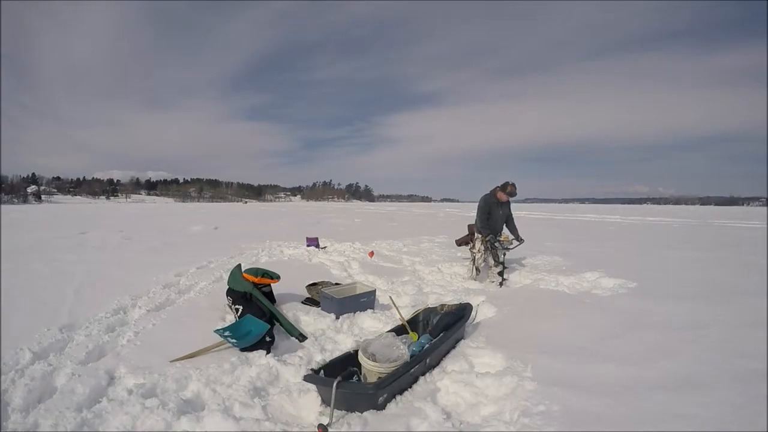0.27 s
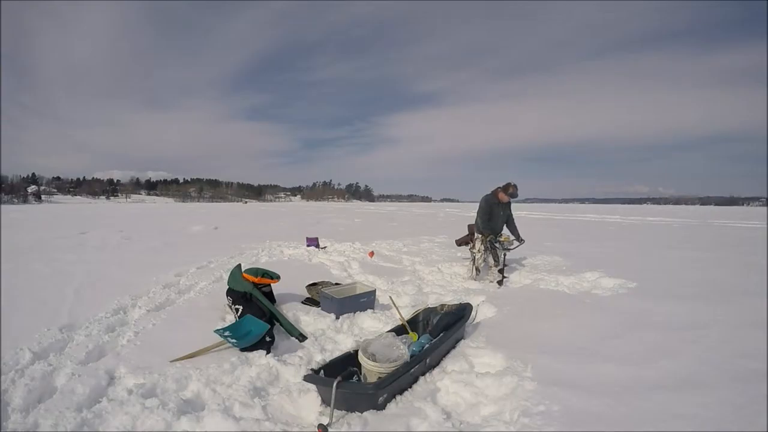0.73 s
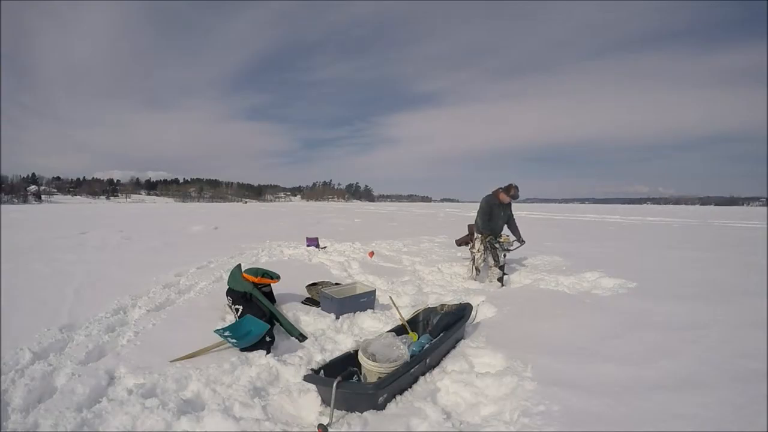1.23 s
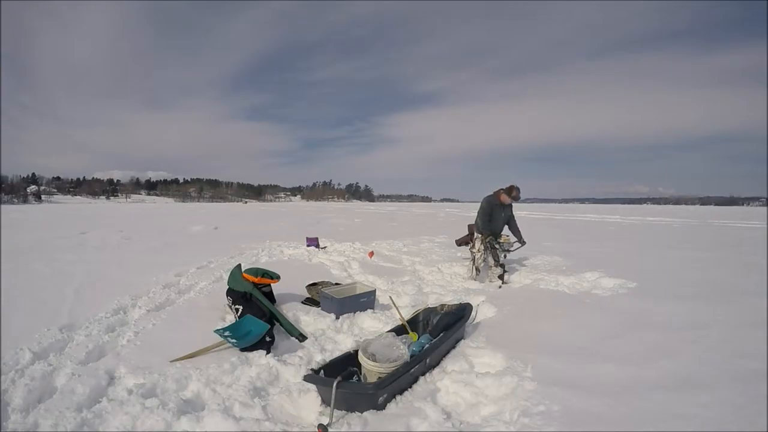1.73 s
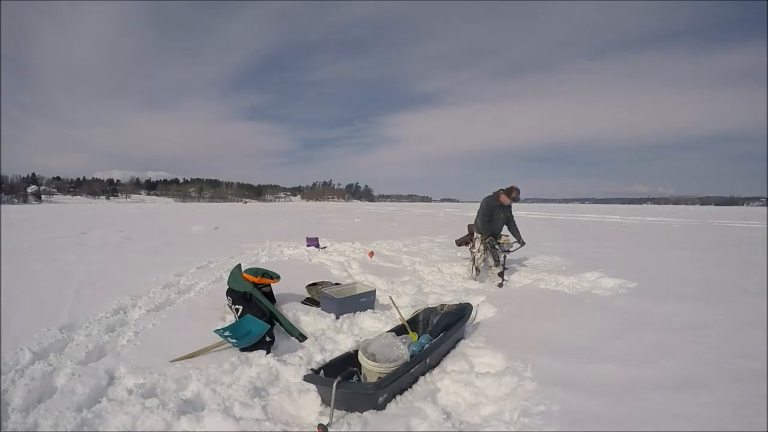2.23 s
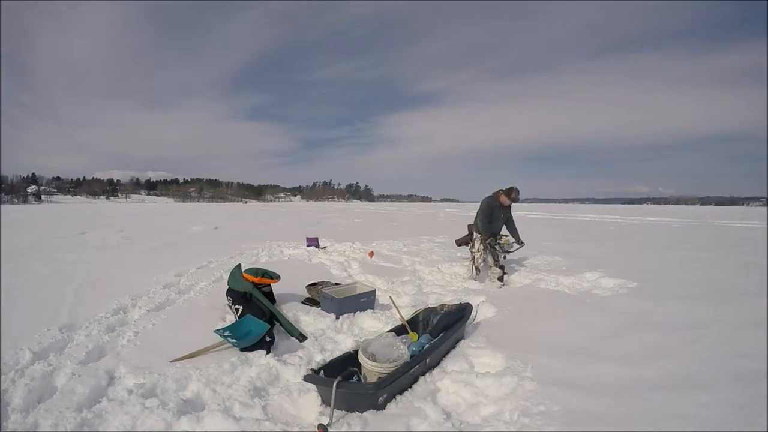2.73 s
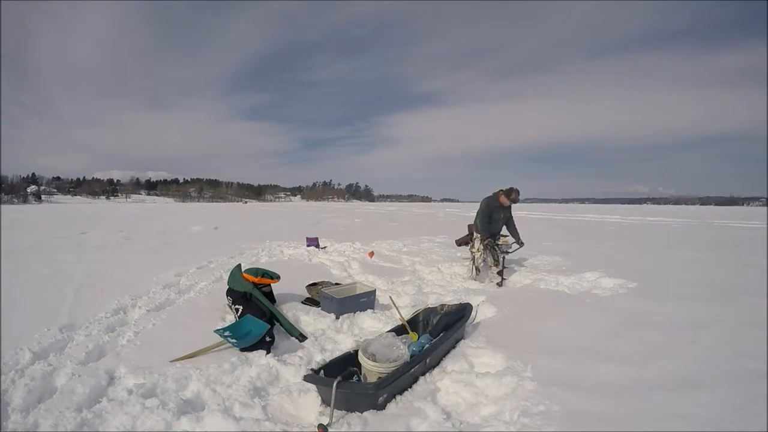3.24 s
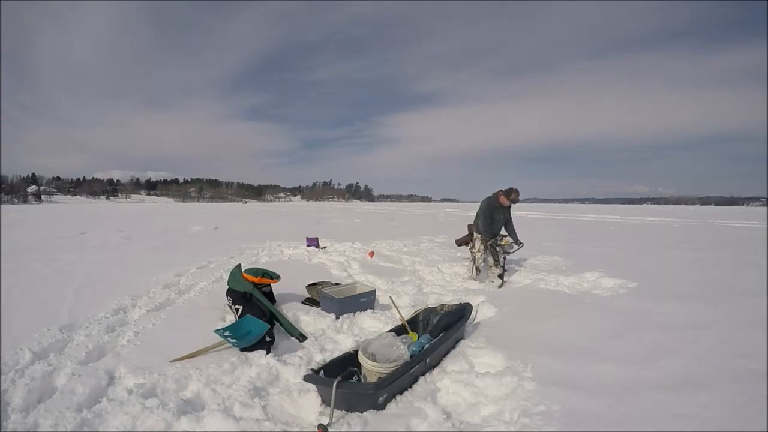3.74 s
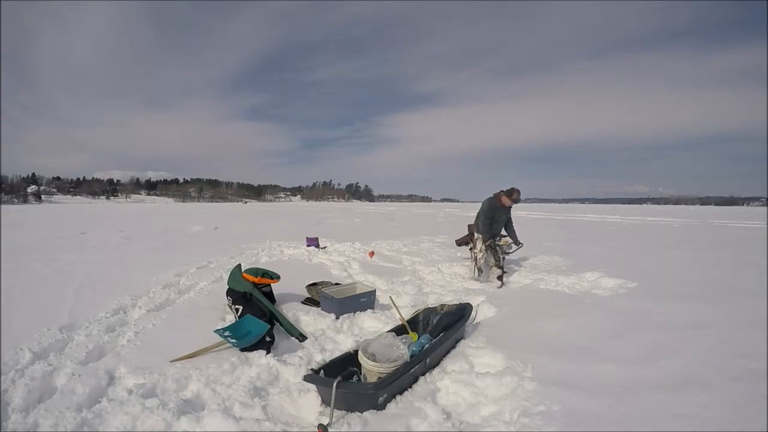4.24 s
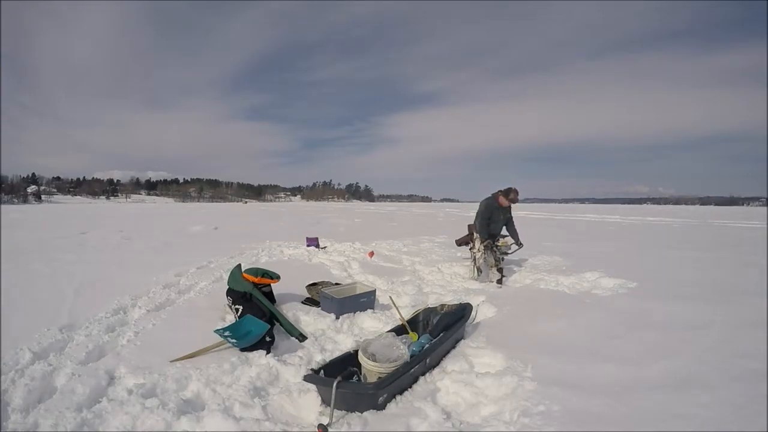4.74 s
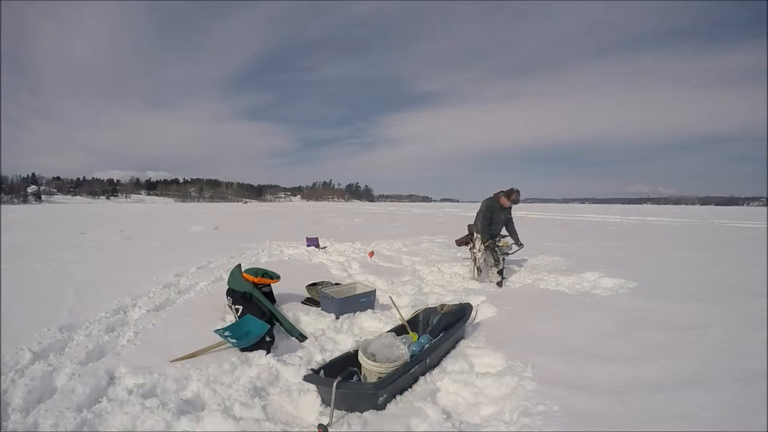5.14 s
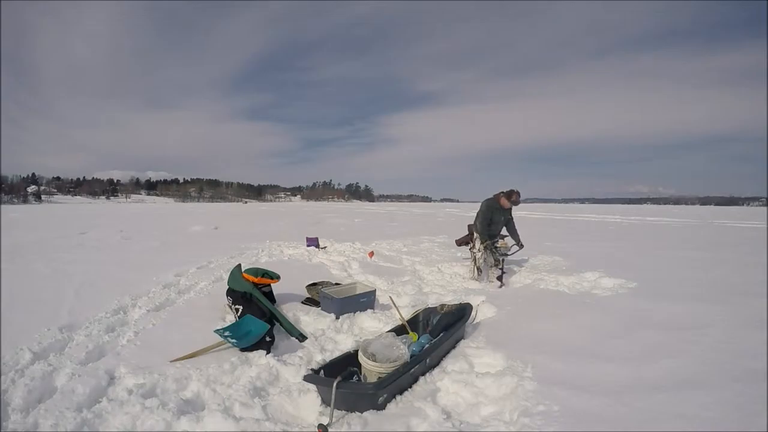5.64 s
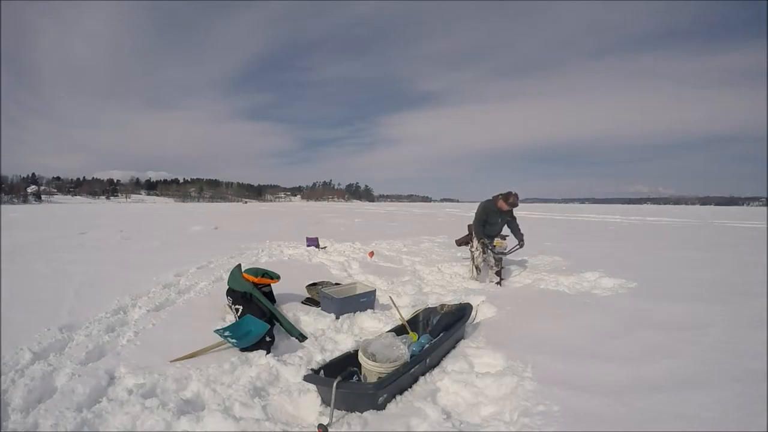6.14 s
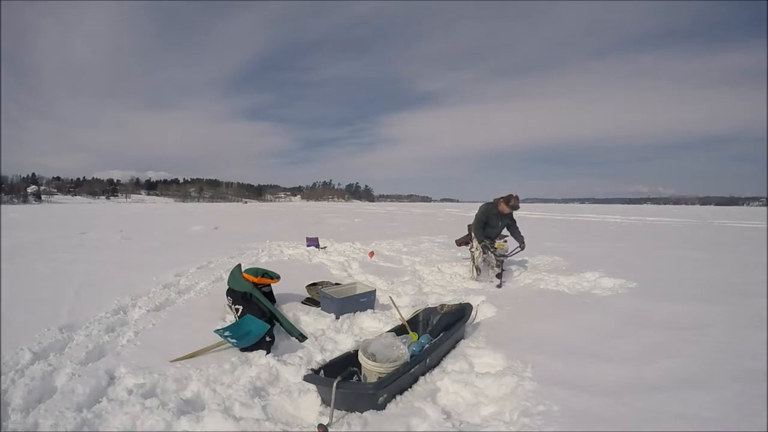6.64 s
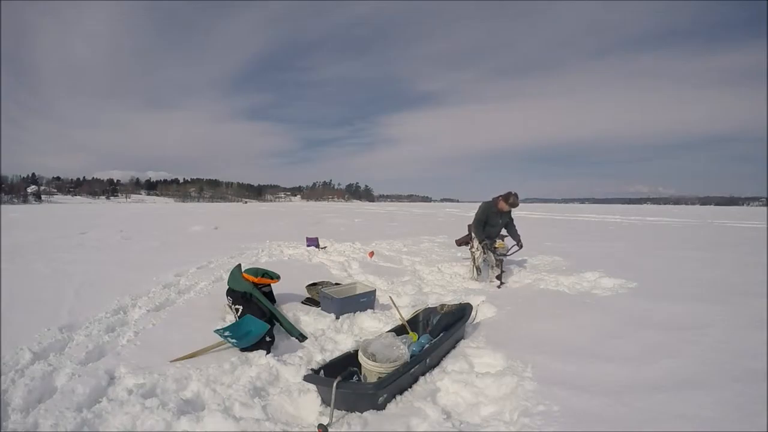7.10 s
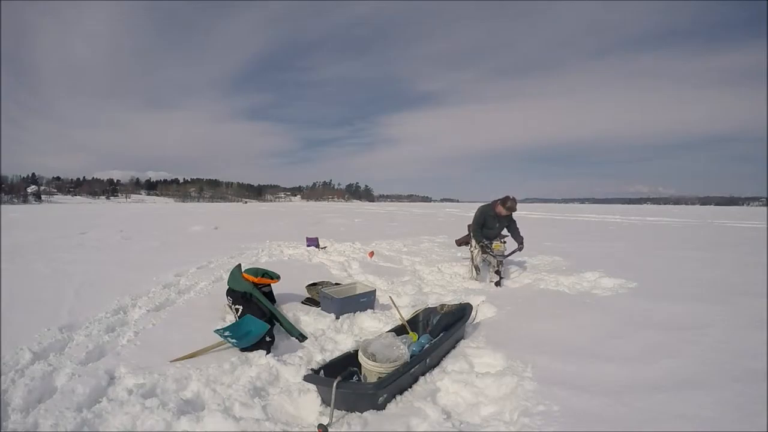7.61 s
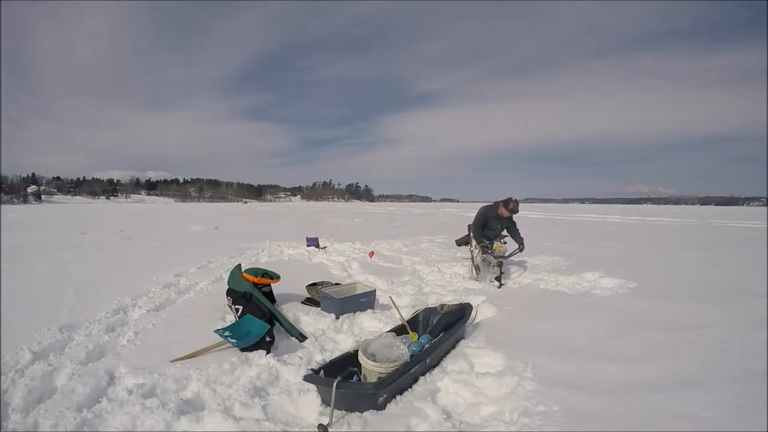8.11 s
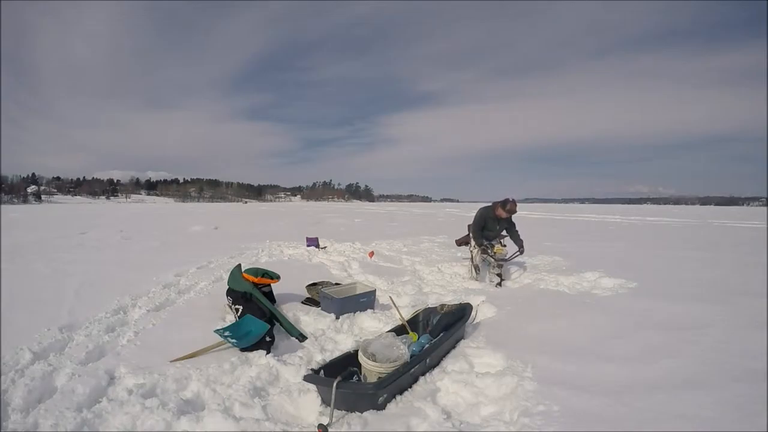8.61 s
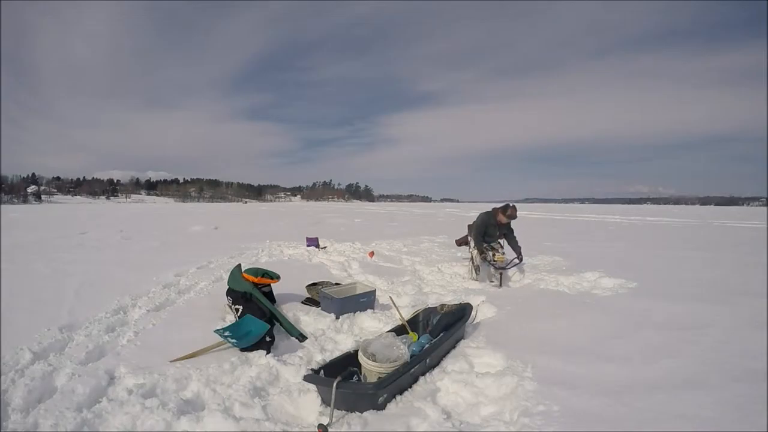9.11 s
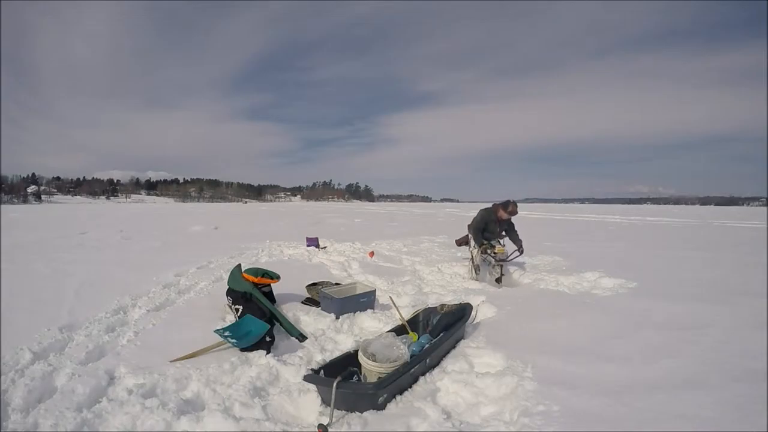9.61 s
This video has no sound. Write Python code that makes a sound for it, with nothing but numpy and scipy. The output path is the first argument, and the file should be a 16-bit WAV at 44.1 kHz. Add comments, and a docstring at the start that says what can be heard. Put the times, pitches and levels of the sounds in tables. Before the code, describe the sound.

A small two-stroke ice auger drones at full throttle, then surges and bogs three times as it bores down, with ice crunching late, outdoors.

```python
"""A two-stroke ice auger bores a hole in a frozen lake, some metres from a microphone standing in the snow.
It drills at full throttle, then is blipped as it sinks; three times the bit catches and the engine bogs.
Each firing gives a low throb and rings the muffler into a rasp; piston and gears clatter in the casing.
Fan and intake hiss, ice chips crunch in filtered noise, and a little wind reaches the microphone.
Only the snow reflects: it returns an echo of the lower part of the rasp."""
import sys
import numpy as np
from scipy import signal
from scipy.fft import rfft, irfft, next_fast_len
from scipy.io import wavfile
from scipy.ndimage import uniform_filter1d

SR = 44100
rng = np.random.default_rng(int(sys.argv[2]) if len(sys.argv) > 2 else 0)


def bounce(signal):
    """Save signal as a 16-bit WAV file at the path given by the first command-line argument."""
    frames = np.transpose(np.atleast_2d(signal))
    limited = np.clip(frames, -1, 1)
    pcm = np.round(limited * 32767).astype(np.int16)
    wavfile.write(sys.argv[1], SR, pcm)


N = 434826  # length in samples

GEAR_RATIO = 11.92  # crank turns to one turn of the reduction gear
# How the clatter of the casing, and the gas puffs with it, answer to the controls. One row: level in dB,
# dB per Hz above cruise, dB per dB of throttle, dB under strain, dB in a stall, dB when fully sunk.
CLATTER_RESPONSE = (-40.5, 0.1051, 0.8157, 3.2, -9, 0.6)


def undb(db):
    """Decibels to gain."""
    return 10 ** (np.asarray(db) / 20)


def unit(x):
    """Scale to an rms of 1."""
    return x / np.sqrt(np.mean(x ** 2))


def curves(table):
    """The columns of a table after its times, joined by straight lines, at every sample."""
    seconds, *columns = np.transpose(table)
    return [np.interp(np.arange(N) / SR, seconds, column) for column in columns]


def walk(rate):
    """Smooth random wander with an rms of 1, through about `rate` random points a second."""
    step = max(int(SR / rate), 2)
    points = rng.standard_normal(N // step + 2)
    path = np.interp(np.arange(N) / step, np.arange(len(points)), points)
    return unit(uniform_filter1d(path, step // 2))


def bump(s, length):
    """A smooth rise to 1 and fall around a moment, down to 1/e at `length` seconds either side."""
    return np.exp(-np.minimum(((np.arange(N) / SR - s) / length) ** 2, 20))


def noise(spectrum):
    """Noise of rms 1, coloured by (Hz, dB) points joined over log frequency."""
    size = next_fast_len(N)
    hz, db = np.transpose(spectrum)
    log_hz = np.log(np.fft.rfftfreq(size, 1 / SR) + 1)
    gain = undb(np.interp(log_hz, np.log(hz), db))
    return unit(irfft(rfft(rng.standard_normal(size)) * gain, size)[:N])


def ring(x, modes, size=4096):
    """Pass x through a resonant body; the response is causal and radiates no deep bass."""
    f = np.fft.rfftfreq(size, 1 / SR) + 1
    gain = 0
    for hz, width, db in modes:
        peak = undb(db) / (1 + (2 * (f - hz) / width) ** 2)
        gain = gain + peak * np.minimum(f / hz, 1) ** 2
    # folding the cepstrum to one side gives the minimum-phase response with this gain
    cepstrum = irfft(np.log(gain))
    response = irfft(np.exp(rfft(2 * cepstrum[:size // 2], size)))
    return unit(signal.oaconvolve(x, response)[:N])


def controls():
    """What the engine is doing: firing rate, throttle, strain, stall and depth, at every sample."""
    # Engine speed, steady while drilling, then swinging with each blip.
    # Each row: time in seconds, firing rate in Hz.
    speed = [(0, 103.5), (0.19, 103), (0.6, 108.8), (1.1, 103.1), (1.47, 104), (2.04, 97.66), (2.46, 106.8),
             (2.85, 112.6), (3.42, 106.2), (3.91, 116.9), (4.35, 115.8), (4.62, 110.5), (5.0, 116.3),
             (5.29, 111.8), (5.77, 109.7), (5.98, 77), (6.25, 81.15), (6.43, 119.7), (6.58, 125.7),
             (6.76, 107.4), (7.02, 127.2), (7.3, 116.7), (7.54, 74.94), (7.84, 80.95), (7.96, 114.1),
             (8.1, 125.6), (8.2, 102.2), (8.5, 99.96), (8.74, 127.5), (9.21, 87.03), (9.42, 113.6),
             (9.8, 85.9)]
    # Throttle, held open and then eased and squeezed in turn.
    # Each row: time in seconds, strength of the firings in dB.
    throttle = [(0, -0.7), (2.2, -0.9), (4.2, -2.5), (4.69, -1.5), (6.36, -1.45), (6.54, -4), (6.85, -3.5),
                (7.05, -5), (7.29, -7), (7.4, -2.4), (7.92, -0.9), (8.06, -5), (8.21, -3.5), (8.62, -4.5),
                (8.79, -7), (9.17, -9.5), (9.26, -2.5), (9.39, -2.5), (9.55, -5.5), (9.85, -10.5)]
    # The engine comes down towards the snow as the bit sinks.
    # Each row: time in seconds, share of the way from 0 to 1.
    sinking = [(0, 0.08), (6, 0.12), (7.3, 0.26), (8.7, 1), (9.86, 1)]
    # The bit catches, the clutch slips and the gears stand still.
    # Each row: start in seconds, length in seconds, depth of the stall (a plain factor).
    stalls = [(6.095, 0.086, 1.12), (7.592, 0.2, 0.78), (9.134, 0.031, 0.33)]
    flywheel_s = 0.048  # the flywheel evens out changes of speed over this time
    stop_s, restart_s = 0.2, 0.51  # the gears run down before a stall and pick up after it
    strain_lead_s, strain_s = 0.11, 0.11  # the engine labours hardest this long before a stall, and for this long

    t = np.arange(N) / SR
    hz = uniform_filter1d(curves(speed)[0], max(int(flywheel_s * SR), 1), mode="nearest")
    strain, stall = np.zeros(N), np.zeros(N)
    for s, length, depth in stalls:
        strain += depth * bump(s - strain_lead_s, strain_s)
        corners = [s - stop_s, s, s + length, s + length + restart_s]
        stall += depth * np.interp(t, corners, [0, 1, 1, 0]) ** 2
    return hz, curves(throttle)[0], strain, stall, curves(sinking)[0]


def loudness(response, state):
    """Level in dB of one part of the engine: its response row weighs each of the controls."""
    cruise_hz = 107  # usual firing rate
    hz, throttle_db, strain, stall, sink = state
    base_db, db_per_hz, throttle_share, strain_db, stall_db, sunk_db = response
    running_db = base_db + db_per_hz * (hz - cruise_hz) + throttle_share * throttle_db
    return running_db + strain_db * strain + stall_db * stall + sunk_db * sink


def firings(turns, scatter_db, jitter_s):
    """One pulse a crank turn, each a little early or late, strong or weak."""
    count = np.arange(1, int(turns[-1]))
    chance = rng.standard_normal((len(count), 2))
    at = np.interp(count, turns, np.arange(N)) + jitter_s * SR * chance[:, 0]
    at = np.clip(at, 0, N - 2)
    strength = undb(scatter_db * chance[:, 1])
    # share each pulse between the two samples it falls between
    i = at.astype(int)
    return np.bincount(i, strength * (1 - at + i), N) + np.bincount(i + 1, strength * (at - i), N)


def off_snow(x, sink, share):
    """Direct sound plus its echo off the snow: a hollow that moves up in pitch as the engine comes down."""
    high_lag_s, sunk_lag_s = 0.0011, 0.00067  # echo delay with the engine high and low
    lag_s = high_lag_s + (sunk_lag_s - high_lag_s) * sink
    n = np.arange(N)
    return x + share * np.interp(n - lag_s * SR, n, x)


def exhaust(turns, state):
    """The port opens once a turn: a pulse and a puff of gas ring the muffler; a throb and growl go with them."""
    # Rings of the muffler. Each row: pitch in Hz, width in Hz, relative level in dB.
    muffler_low = [(464, 64, -17), (568, 165, -7.5), (774, 240, -5), (908.4, 73, 7.5), (1048, 65, 6),
                   (1192, 170, 5.5)]
    muffler_high = [(1215.5, 104, -0.98), (1362, 92, -1)]
    # Low overtones out of the tailpipe. Each row: frequency in Hz, relative level in dB.
    tailpipe = [(150, -17.5), (210, -12), (250, -10.5), (320, -13.5), (380, -16.5), (420, -26.5),
                (480, -23.5), (540, -41), (700, -58)]
    # How throb, growl, lower and upper rings answer to the controls. One row each: level in dB, dB per Hz
    # above cruise, dB per dB of throttle, dB under strain, dB in a stall, dB when fully sunk.
    throb_response = (-44, -0.14, 0.9, 1.8, -1, -1)
    growl_response = (-46, 0.015, 2.15, 1, -1, -1)
    low_response = (-47, -0.1047, 1.52, -1, -2.5, 4)
    high_response = (-51.5, .06, 1, 8.0, 2.5, 10.5)
    low_swell_db, high_swell_db = 0.9, 1.7  # swing of the rings on each turn of the reduction gear

    hz, sink = state[0], state[-1]
    # at low speed the cylinder fires strongly only on about every other turn, and the throb lopes
    bogging = np.clip((95 - hz) / 18, 0, 1)
    lope = 1 + 0.23 * bogging * np.cos(np.pi * turns + 2.0 * walk(5))
    throb = unit(-np.cos(2 * np.pi * turns)) * lope

    growl = np.zeros(N)
    for k in range(2, 7):
        overtone_db = np.interp(k * hz, *np.transpose(tailpipe)) + 0.53 * walk(20)
        growl += np.sqrt(2) * undb(overtone_db) * np.cos(2 * np.pi * k * (turns - 1 / 4))

    pulses = unit(firings(turns, scatter_db=0.66, jitter_s=0.000022))
    # a hard-running engine pushes more gas through; in a stall the putts are clean
    gas_decay = np.exp(-(turns % 1) / 0.5)
    puff = unit(gas_decay * rng.standard_normal(N) * undb(loudness(CLATTER_RESPONSE, state)))
    low = ring(off_snow(pulses + undb(-14.5) * puff, sink, share=0.39), muffler_low)
    high = ring(pulses + undb(-3) * puff, muffler_high)

    # the firing grows unsteady as the bit sinks
    throb_db = loudness(throb_response, state) + (0.4 + 0.85 * sink) * walk(25)
    growl_db = loudness(growl_response, state) + 2 * sink * walk(9)
    # the rasp swells with each turn of the reduction gear, the upper rings first
    gear = 2 * np.pi * turns / GEAR_RATIO
    low_db = loudness(low_response, state) + low_swell_db * np.cos(gear - 1.8)
    high_db = loudness(high_response, state) + high_swell_db * np.cos(gear - 0.6)
    return throb * undb(throb_db) + growl * undb(growl_db) + low * undb(low_db) + high * undb(high_db)


def machinery(turns, state):
    """Dense small impacts of piston and gears ring the casing; fan and intake hiss, strongest once a turn."""
    # Rings of casing and gearbox. Each row: pitch in Hz, width in Hz, relative level in dB.
    casing = [(1038, 143, -12), (1195, 380, -4), (1616, 56, -2), (1793, 42, -3), (2076, 111, 4),
              (2189, 25, 2.5), (2492, 264, -1), (2884, 136, -10.5), (3093, 47, -5), (3494, 580, -11.5),
              (4007, 186, -9), (4287, 318, 0), (4573, 213, -5.5), (4944, 365, -13)]
    # Hiss of fan and intake. Each row: pitch in Hz, width in Hz, relative level in dB.
    hiss_bands = [(5770, 360, -8), (6230, 210, -3), (6684, 230, -4), (7140, 130, -6.5), (7800, 610, -8.5),
                  (8400, 270, -15.5), (9670, 1030, -7), (10535, 1040, -3), (13400, 500, -22),
                  (13150, 770, -16.5), (14540, 600, -18)]
    # How the hiss answers to the controls. One row: level in dB, dB per Hz above cruise,
    # dB per dB of throttle, dB under strain, dB in a stall, dB when fully sunk.
    hiss_response = (-55, -0.0156, 0.95, 1, -12.0, -2.5)

    # the load pulses with each turn of the reduction gear
    gear = 2 * np.pi * turns / GEAR_RATIO
    swell = np.cos(gear) + np.cos(2 * gear + np.pi / 2) / 2

    impacts_db = 1.05 * swell + 1.0 * walk(45) + 1.0 * walk(700)
    impacts_db += 0.5 * np.cos(2 * np.pi * (turns - 0.35))  # once a crank turn
    clatter = ring(rng.standard_normal(N) * undb(impacts_db), casing)

    gas_db = 0.25 * swell + 0.79 * walk(45) + 1.2 * walk(900)
    gas_db += 2.0 * np.cos(2 * np.pi * (turns - 0.2))
    hiss = ring(rng.standard_normal(N) * undb(gas_db), hiss_bands)

    clatter_db = loudness(CLATTER_RESPONSE, state) + 0.06
    return clatter * undb(clatter_db) + hiss * undb(loudness(hiss_response, state))


def weather():
    """Gusts buffet the microphone with low fluttering noise, over a faint steady rush of air."""
    # Gusts at the microphone. Each row: peak time in seconds, length in seconds,
    # level in dB about which they flutter.
    gusts = [(6.6, 0.15, -60), (7.16, 0.31, -61), (8.201, 0.086, -52.5), (8.48, 0.069, -44),
             (8.84, 0.26, -53.5), (9.596, 0.11, -52), (9.837, 0.076, -47)]
    # Colour of the buffeting and of the rush. Each row: frequency in Hz, relative level in dB.
    buffet = [(10, -18), (35, -8.5), (60, -11.5), (110, -20), (200, -33.5), (500, -34), (2000, -61)]
    air = [(20, -58), (100, 15.5), (170, 6.5), (270, -1.5), (450, -12), (800, -0.5), (2000, 9.5),
           (6000, -32), (15000, -55)]

    wind = undb(-60.5) * np.ones(N)  # the breeze between gusts
    for s, length, db in gusts:
        wind += undb(db) * bump(s, length)
    flutter_db = 1.2 * walk(12)
    return noise(buffet) * wind * undb(flutter_db) + noise(air) * undb(-58.0)


def ice(sink):
    """Chips and packed snow give way: a lumpy, dull thud with a grainy crackle; chips multiply as the bit sinks."""
    # Crunches of ice chips and snow.
    # Each row: peak time in seconds, length in seconds, thud level in dB, crackle level in dB.
    crunches = [(6.677, 0.026, -68, -44.5), (6.78, 0.016, -72, -57), (8.159, 0.025, -53, -50),
                (8.233, 0.027, -51, -50), (8.366, 0.029, -58, -54), (8.454, .04, -47, -68),
                (8.488, 0.012, -52, -43), (8.527, 0.023, -61, -67), (9.454, 0.02, -66, -50),
                (9.489, 0.032, -55, -50), (9.582, 0.018, -57, -46), (9.666, .025, -57, -59),
                (9.764, .06, -59, -62)]
    # Colour of thud and of crackle. Each row: frequency in Hz, relative level in dB.
    thud_colour = [(30, -10), (70, 10), (150, 9), (220, 5), (310, 3), (430, 1), (570, 11), (700, -15),
                   (850, 7.5), (2000, -71)]
    crackle_colour = [(400, -26), (1200, 15), (3300, 5), (4600, -29), (6000, -8), (10500, -4.5),
                      (15000, -22)]
    chips_per_s, chip_s = 14, 0.015  # small chips: rate with the bit fully sunk, decay time of each
    chip_thud_db, chip_crackle_db = -68, -59

    lands = rng.random(N) < chips_per_s * sink ** 2 / SR
    chips = signal.lfilter([1], [1, -np.exp(-1 / (chip_s * SR))], lands * 1.0)
    thud, crackle = chips * undb(chip_thud_db), chips * undb(chip_crackle_db)
    for s, length, thud_db, crackle_db in crunches:
        press = bump(s, length)
        thud += undb(thud_db) * press
        crackle += undb(crackle_db) * press
    lumpy = unit(noise(thud_colour) * undb(3 * walk(140)))
    grainy = unit(noise(crackle_colour) * undb(2.7 * walk(600)))
    return thud * lumpy + crackle * grainy


def scene():
    """The crank drives exhaust and machinery together; its speed flutters and sags a little on each gear turn."""
    state = controls()
    turns = np.cumsum(state[0]) / SR
    sag = 0.011 * np.sin(2 * np.pi * turns / GEAR_RATIO)
    turns = turns + 0.012 * walk(22) + sag
    engine = exhaust(turns, state) + machinery(turns, state)
    return (engine + weather() + ice(state[-1]))[None]


def record(dry):
    """The microphone's steep low-pass cuts everything above 15.3 kHz."""
    top_cut = signal.ellip(10, 0.2, 70, 15300, fs=SR, output="sos")
    return signal.sosfilt(top_cut, dry)


dry = scene()
out = record(dry)
bounce(out)
```